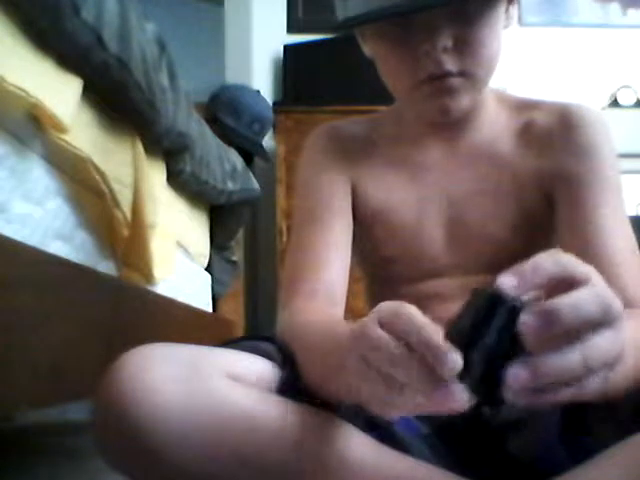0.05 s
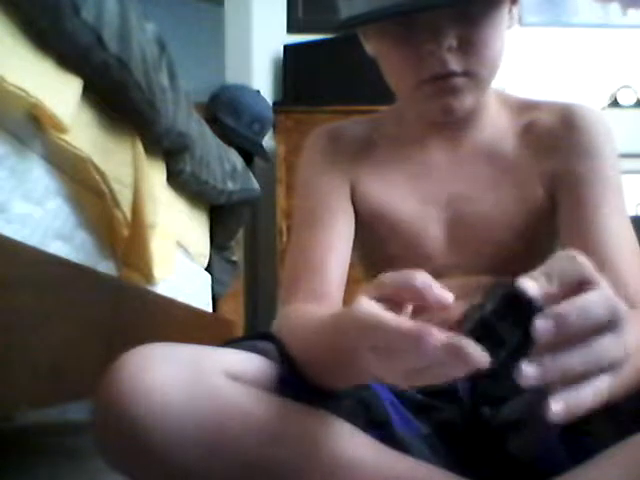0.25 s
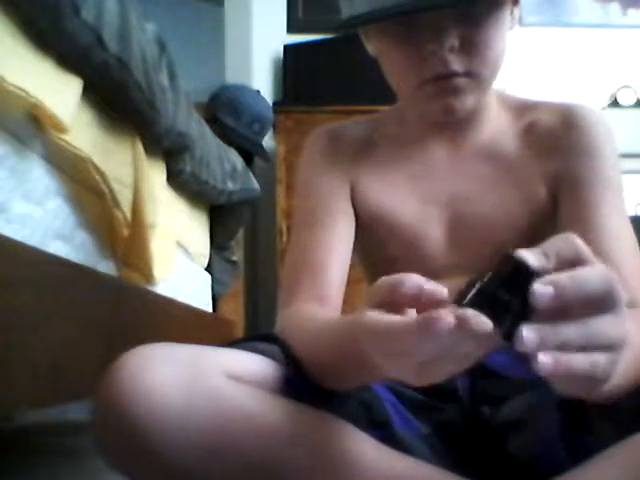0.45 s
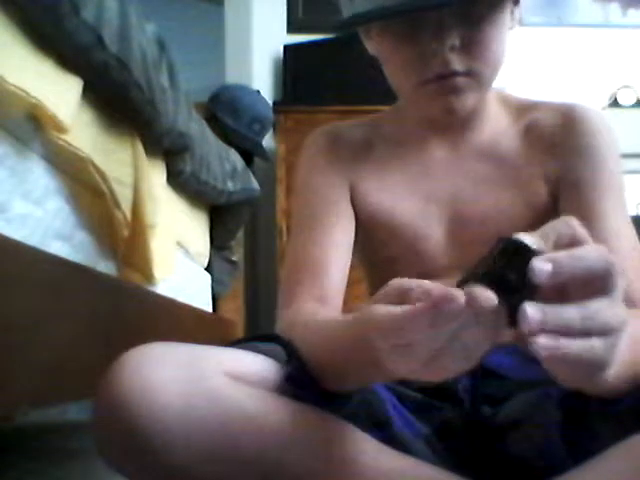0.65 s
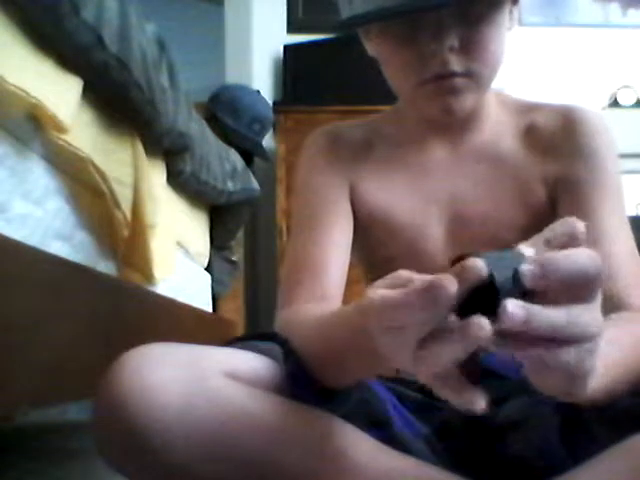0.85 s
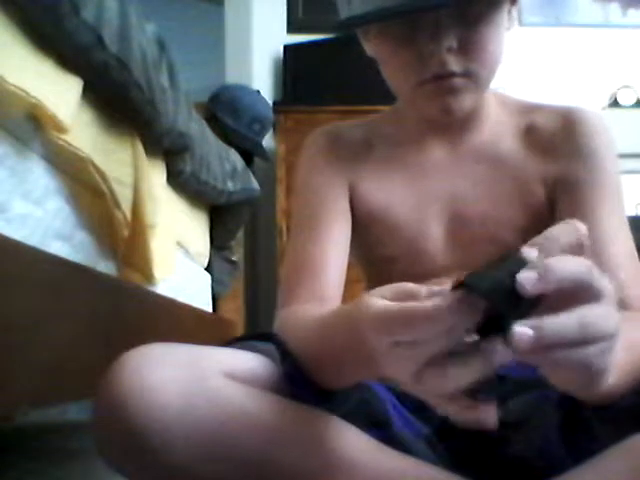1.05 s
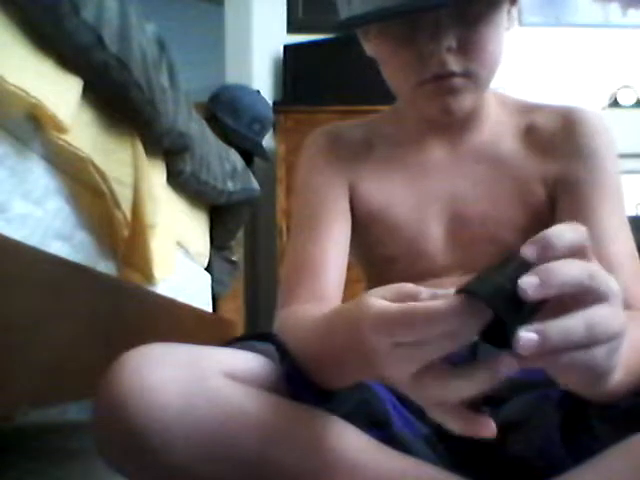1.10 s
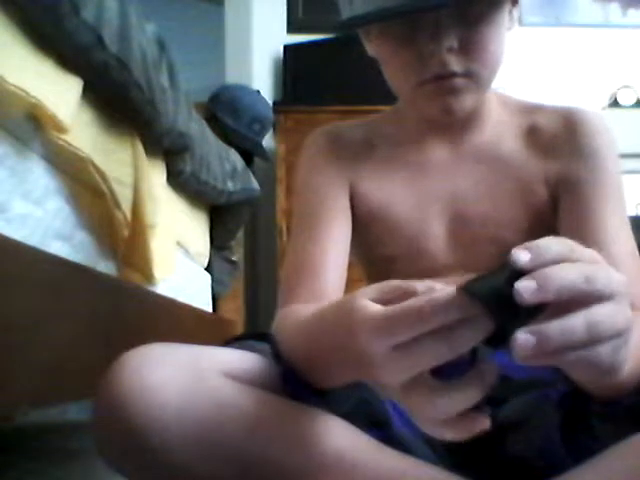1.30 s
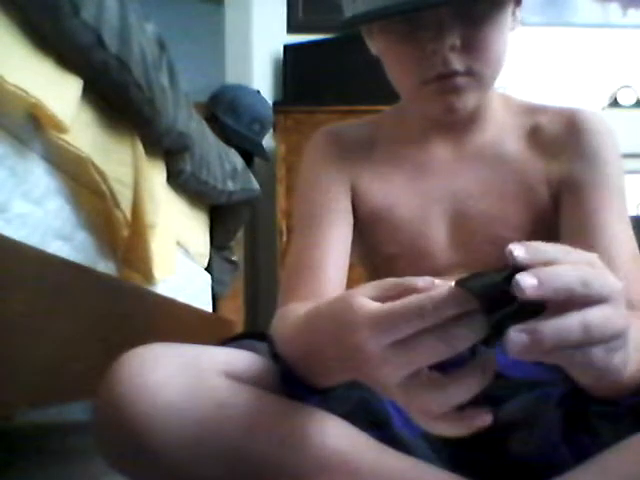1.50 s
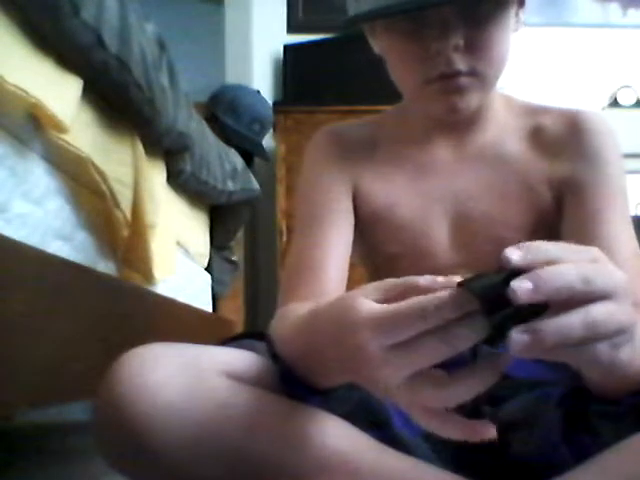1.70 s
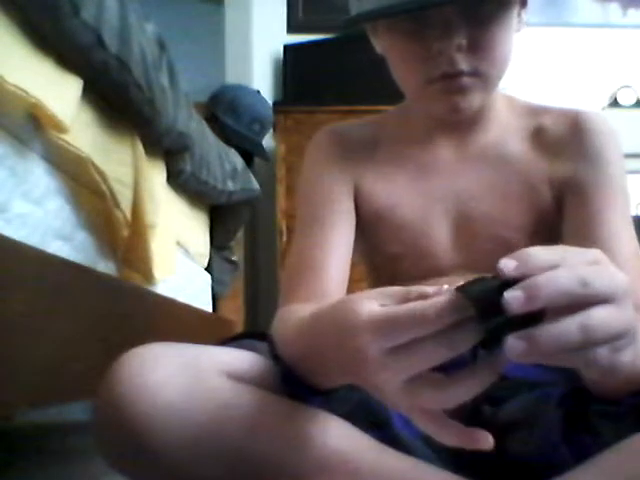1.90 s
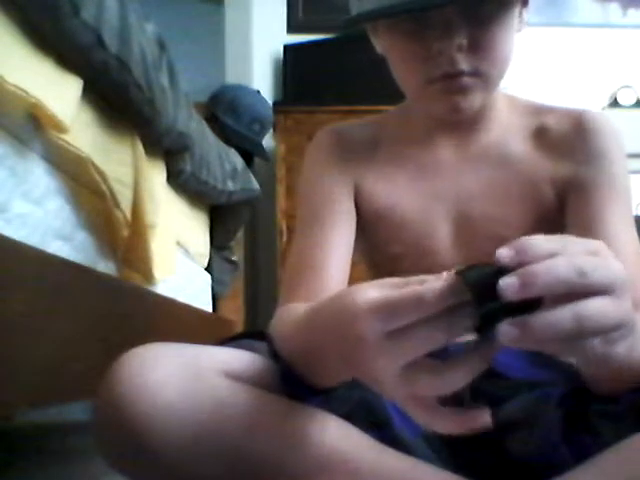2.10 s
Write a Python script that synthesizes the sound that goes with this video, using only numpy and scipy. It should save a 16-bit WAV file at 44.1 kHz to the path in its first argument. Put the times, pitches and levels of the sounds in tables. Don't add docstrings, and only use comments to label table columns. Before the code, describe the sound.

A small hollow plastic object snaps with one loud sharp clack, then rattles in the hands

```python
import sys
import numpy as np
from scipy import signal
from scipy.fft import rfft, irfft, next_fast_len
from scipy.io import wavfile
from scipy.ndimage import uniform_filter1d, map_coordinates

SR = 44100
rng = np.random.default_rng(int(sys.argv[2]) if len(sys.argv) > 2 else 0)


def generate_wav(signal):
    frames = np.transpose(np.atleast_2d(signal))
    scaled = np.clip(frames, -1, 1) * 32767
    pcm = np.round(scaled).astype(np.int16)
    wavfile.write(sys.argv[1], SR, pcm)


def how_loud(loudness_db):
    steps = np.asarray(loudness_db, float) / 20
    return 10 ** steps


N = 94815

# t/s, cavity level/dB, cavity f/Hz, edge level/dB
FUMBLE = [(0.0, -24.5, 1450.0, -42), (0.0027, -32, 1970.0, -43), (0.0041, -41, 1520.0, -35.5),
          (0.0052, -30.5, 1530.0, -53), (0.0168, -47.5, 1670.0, -61.5), (0.0299, -44.5, 2250.0, -60.5),
          (0.0367, -47.5, 1700.0, -62.5), (0.0523, -31.5, 1540.0, -63), (0.0618, -42, 1430.0, -62.5),
          (0.064, -38, 1590.0, -63), (0.0665, -37.5, 1540.0, -60), (0.07, -36.5, 2440.0, -63),
          (0.0784, -42, 1490.0, -64.5), (0.094, -45, 1530, -64.5), (0.1192, -46.5, 1550, -62.5)]
# t/s, cavity level/dB, cavity f/Hz, edge level/dB
TILT = [(0.7075, -29, 1813, -39), (0.7087, -57, 1802, -39), (0.7103, -40, 1991, -37),
        (0.7138, -29, 2330, -41.5), (0.7263, -31.5, 1393, -59), (0.727, -30.5, 2284, -55),
        (0.7334, -34, 2400, -61.8), (0.7377, -36, 2262, -63), (0.7422, -38, 2100.0, -60),
        (0.7468, -38.7, 2420, -63.3), (0.7593, -31, 2095, -59), (0.7627, -27, 2267, -63),
        (0.7665, -31, 2310, -59.7), (0.773, -34, 1744, -59.5), (0.7746, -33, 2294, -59.6),
        (0.7839, -40, 2188, -63), (0.7873, -26.5, 2274, -46), (0.7926, -33.5, 2348, -57),
        (0.7985, -39.5, 2361, -63), (0.8011, -39.5, 2260.0, -64), (0.8066, -35.5, 2260, -64),
        (0.8138, -41.5, 2460, -66), (0.8237, -44.7, 2130, -67), (0.828, -41, 2120.0, -68),
        (0.835, -40, 2250.0, -65), (0.8769, -41.5, 2220, -66)]
# t/s, cavity level/dB, cavity f/Hz, edge level/dB
SETTLE = [(1.1079, -36, 2660, -62), (1.1282, -40.7, 2460, -61), (1.1563, -38.5, 2500.0, -63),
          (1.1894, -36, 2420.0, -52), (1.192, -46, 2650.0, -53), (1.1936, -43, 2100, -46),
          (1.1983, -33.5, 2340, -50), (1.2016, -29.5, 2380, -39), (1.2106, -45, 2620, -60),
          (1.2251, -41, 2550, -62), (1.2371, -43, 2450.0, -61.7), (1.2508, -44, 2440, -61.8),
          (1.2608, -44.5, 1313, -56.6), (1.2626, -41.5, 2430, -62.3), (1.2698, -36.5, 2390.0, -53),
          (1.2764, -50, 2380, -62.0), (1.2832, -42.5, 2200.0, -53), (1.2898, -47.0, 2370, -63.7),
          (1.563, -48, 2730, -56.5), (1.5665, -46.5, 2410, -58.5), (1.57, -49, 2550, -51.5),
          (1.5741, -50.5, 2560, -55), (1.8227, -51.5, 2600, -54)]
# t/s, cavity level/dB, cavity f/Hz, edge level/dB, edge f/Hz
SNAP = [(0.1862, -49.5, 2350, -46.5, 5800), (0.1863, -36.5, 2350.0, -56.5, 5640),
        (0.1929, -32.5, 1410.0, -57.5, 4500.0), (0.1954, -23.5, 1510.0, -59, 6770),
        (0.1978, -34, 2430.0, -51.5, 9500), (0.2005, -32, 2350.0, -60.5, 3680.0),
        (0.2029, -23.5, 1390.0, -45.5, 4770), (0.2074, -18.5, 2060.0, -18.5, 5860),
        (0.2109, -3, 2250.0, -16.5, 3730), (0.213, -13.5, 2420.0, -11, 5300),
        (0.2145, -15, 1050, -11.5, 4330), (0.2163, -13, 2260.0, -17, 6200),
        (0.2183, -23, 2360.0, -12, 4300), (0.2197, -15, 2470.0, -24, 5400), (0.2215, -8, 2370.0, -22, 4200),
        (0.2242, -23.5, 2360.0, -3, 4800), (0.2266, -18.5, 2300.0, -10.5, 3800),
        (0.2289, -11, 2430.0, -9.5, 4080), (0.2315, -28, 2400.0, -21, 4860),
        (0.2352, -25.5, 2370.0, -28, 5060.0), (0.2398, -19, 2380.0, -23, 4070),
        (0.2436, -28.5, 2300.0, -22.5, 3870), (0.2463, -22.5, 2360.0, -28, 6000),
        (0.25, -23, 2410.0, -36, 5840.0), (0.2531, -26, 2360.0, -29.5, 6130.0),
        (0.2549, -21.5, 2390.0, -38, 3920), (0.2565, -33, 2490.0, -28, 4850),
        (0.259, -21.5, 2310.0, -24, 4580), (0.2606, -30, 3100.0, -23, 4630)]
# t/s, cavity
# level/dB, cavity f/Hz, edge level/dB, edge f/Hz
RATTLE = [(0.7171, -24, 2291, -30, 6960), (0.935, -34, 2400, -58, 7650), (0.9341, -33, 2330, -36, 7640),
          (0.9372, -27.5, 2260, -35.5, 4530), (0.9437, -34, 2400, -46, 4800),
          (0.9448, -28.9, 2250, -48, 6070.0), (0.9468, -33.5, 1420, -34.5, 4770.0),
          (0.9498, -38, 2230, -47.1, 5890.0), (0.9515, -40, 2400, -53.9, 4890.0),
          (0.9572, -29, 2320, -21.5, 5700), (0.966, -39, 2354, -31, 6000),
          (0.9675, -18.0, 2366, -24.5, 4620.0), (0.9688, -38, 2390, -28, 4500),
          (0.9712, -24, 2353, -26, 6260), (0.9754, -27, 2210, -28, 4660.0), (0.9776, -44, 2470, -37, 4700),
          (0.9792, -18.5, 2393, -29.5, 4420), (0.9819, -41, 2440, -28.5, 4300),
          (0.984, -35, 2410, -33.5, 4500), (0.9973, -38, 2380.0, -57, 4640.0),
          (1.0023, -33.5, 2760.0, -52.5, 4770), (1.0037, -28, 2370, -33, 4130.0),
          (1.0088, -39, 2630, -32.5, 6000), (1.0092, -30.5, 2610, -15.5, 6000),
          (1.0102, -20, 2600, -14.5, 5920.0), (1.017, -23, 1470, -26.5, 4750),
          (1.0178, -20.5, 2538, -20.5, 4670), (1.0247, -25, 2453, -17.5, 5950),
          (1.0277, -38, 2560.0, -31.5, 6220), (1.0291, -30, 1290.0, -38, 4730.0),
          (1.031, -15, 2447, -27.5, 4586), (1.0353, -21.5, 2553, -18.5, 6160.0),
          (1.0389, -22, 2437, -17.5, 9490), (1.0411, -26, 1396, -26, 5890),
          (1.0442, -25, 2470, -23.5, 5910), (1.0461, -43.5, 2566, -27, 4600),
          (1.047, -24, 2373, -47, 4310.0), (1.0594, -35, 2625, -48, 6500.0),
          (1.0629, -44, 2597, -49, 4610.0), (1.2005, -34, 2390, -32.5, 6670)]
# f/Hz, level/dB, T60/s
SHELL_MODES = [(462, -19, 0.014), (900, -10, 0.0062), (1580, -9, 0.013), (2547, -3, 0.0076),
               (3200, -16, .005)]
# f/Hz, level/dB, T60/s
RIM_MODES = [(3820, -7, 0.005), (4500, -15, 0.026), (6000, -5, 0.0065), (7800, -16, 0.0088),
             (10670, -12.5, 0.00316)]
# f/Hz, level/dB
CRACK_SPECTRUM = [(300, -17), (2500, -1.5), (7000, -1.5), (14000, -20)]
# f/Hz, level/dB, T60/s
KNOCK_MODES = [(150, -37.5, .025), (901.3, -13, .016)]
# start t/s, length/s, level/dB
CHATTER_SPELLS = [
    (0, .13, -57.5),
    (.212, 0.023, -24.5),
    (0.234, .03, -35),
    (.708, 0.02, -39.5),
    (0.761, 0.1, -55.5),
    (0.933, 0.045, -47),
    (1.011, 0.032, -32),
    (1.05, 0.27, -63),
]
# f/Hz, level/dB
RADIATION = [(100, -33.5), (350, 0), (9500, 2), (11500, 1.5), (15000, -20)]
# f/Hz, T60/s
ROOM_T60 = [(300, .35), (2400, 0.35), (4500, 0.37), (8000, 0.33), (13000, 0.15)]
# f/Hz, level/dB
ROOM_COLOUR = [(300, -3.5), (1400, 0.5), (2400, -2), (3600, -3), (4600, 1), (5700, -4.5), (9000, 6.5),
               (12000, 1.5)]
# f/Hz, level/dB
HISS_SPECTRUM = [(150, -22.5), (400, -6), (1500, -12.5), (3500, -15.5), (6000, -21), (9000, -17.5),
                 (14500, -17)]
# f/Hz, level/dB
RUMBLE_SPECTRUM = [(20, -14.5), (70, -2.5), (130, -2), (300, -5.5), (700, -32.5)]

CAVITY_T60_S, CAVITY_RISE_S = 0.012, 0.00078
SOFTEN_DB_PER_DB = 0.083
EDGE_T60_S, EDGE_RISE_S, EDGE_FADE_POWER = 0.0097, 0.00027, 1.4
DULL_EDGE_HZ, DULL_RIM_DB = 4500, -4
CRACK_T60_S, CRACK_DB = 0.0069, -2
KNOCK_S = 0.2112
CHATTER_HZ, CHATTER_SPREAD, CHATTER_OVERTONE = 2250, 0.22, 1.95
CHATTER_PER_S, CHATTER_DB = 960, 2.5
ROOM_DB, ROOM_DELAY_S, ROOM_BUILD_S = -18, 0.0025, 0.0051
SNAP_WET_DB, SNAP_ENDS_S = 3, 0.3
OPEN_DB, THRESHOLD_DB, SLOPE, RELEASE_DB_PER_S, SMOOTH_S = 9.5, -57, 0.6, 39, 0.02
DUCK_ABOVE_DB, DUCK_SLOPE, DUCK_LATE_S, DUCK_SPAN_S = -28, 1.2, 0.035, 0.055
HISS_DB = -61
RUMBLE_DB, RUMBLE_SWAY_DB, RUMBLE_DUCK_POWER = -66.5, 3.5, 2.8
SWELL_S, SWELL_WIDTH_S, SWELL_DB = 1.17, 0.091, 8
TOP_HZ = 14500


def contacts():
    sharp = list(SNAP + RATTLE)
    dull = [tuple(row) + (DULL_EDGE_HZ,) for row in FUMBLE + TILT + SETTLE]
    start_s, cavity_db, cavity_hz, edge_db, edge_hz = np.array(sharp + dull).T[:, :, None]
    t = np.arange(SR // 30)[None] / SR
    luck = rng.standard_normal((len(start_s), 24))

    cavity_rise_s = CAVITY_RISE_S * how_loud(SOFTEN_DB_PER_DB * np.clip(cavity_db - edge_db, 0, 20))
    edge_t60_s = EDGE_T60_S * (DULL_EDGE_HZ / edge_hz) ** EDGE_FADE_POWER
    rows = ring(t, cavity_hz, cavity_db + 6.5, CAVITY_T60_S, cavity_rise_s)
    rows += ring(t, edge_hz, edge_db + 1.5, edge_t60_s, EDGE_RISE_S)

    rim_db = edge_db + DULL_RIM_DB * (edge_hz == DULL_EDGE_HZ)
    for k, (hz, db, t60_s) in enumerate(SHELL_MODES + RIM_MODES):
        in_shell = k < len(SHELL_MODES)
        base_db = cavity_db if in_shell else rim_db
        rise_s = cavity_rise_s if in_shell else EDGE_RISE_S
        mode_hz = hz * (1 + 0.044 * luck[:, k, None])
        mode_db = base_db + db + 3 * luck[:, k + 12, None]
        rows += ring(t, mode_hz, mode_db, t60_s, rise_s)

    crack = coloured(CRACK_SPECTRUM, rows.size).reshape(rows.shape)
    crack *= 1 - np.exp(-(t / EDGE_RISE_S) ** 2)
    rows += how_loud(edge_db + CRACK_DB - 60 * t / CRACK_T60_S) * crack
    return place(start_s[:, 0], rows)


def knock():
    hz, db, t60_s = np.array(KNOCK_MODES).T[:, :, None]
    t = np.arange(SR // 15)[None] / SR
    return place(np.full(len(KNOCK_MODES), KNOCK_S), ring(t, hz, db, t60_s, CAVITY_RISE_S))


def chatter():
    start_s, length_s, db = np.array(CHATTER_SPELLS).T[:, :, None]
    gap_luck, level_luck, pitch_luck = rng.standard_normal((3, len(CHATTER_SPELLS), 180))
    since_s = np.cumsum(np.exp(0.6 * gap_luck), axis=1) / CHATTER_PER_S
    tick_db = db + CHATTER_DB + 3 * level_luck - 5 * since_s / length_s
    tick_db = tick_db - 200 * (since_s > length_s)
    tick_db = tick_db.reshape(-1, 1)
    hz = (CHATTER_HZ * np.exp(CHATTER_SPREAD * pitch_luck)).reshape(-1, 1)
    t = np.arange(SR // 60)[None] / SR
    rows = ring(t, hz, tick_db, CAVITY_T60_S, CAVITY_RISE_S)
    rows += ring(t, CHATTER_OVERTONE * hz, tick_db - 5, EDGE_T60_S, EDGE_RISE_S)
    return place((start_s + since_s).ravel(), rows)


def room(x):
    hz, t, z = signal.stft(rng.standard_normal(SR * 3 // 4), SR, nperseg=256)
    decay = how_loud(-60 * t / along(ROOM_T60, hz)[:, None])
    tail = signal.istft(z * decay, SR, nperseg=256)[1]
    tail = tail * (1 - np.exp(-np.arange(len(tail)) / SR / ROOM_BUILD_S))
    tail = np.pad(tail, (round(ROOM_DELAY_S * SR), 0))
    wet = signal.fftconvolve(x, tail / np.linalg.norm(tail))[:N]
    return shaped(wet, ROOM_COLOUR)


def expander(x):
    wanted_db = np.clip(SLOPE * (power_db(x, 400) - THRESHOLD_DB), 0, OPEN_DB)
    fall_db = RELEASE_DB_PER_S * np.arange(N) / SR
    gain_db = np.maximum.accumulate(wanted_db + fall_db) - fall_db
    gain_db = uniform_filter1d(gain_db, round(SMOOTH_S * SR))

    slow_db = power_db(x, round(DUCK_SPAN_S * SR))
    late_db = np.pad(slow_db, (round(DUCK_LATE_S * SR), 0), "edge")[:N]
    duck_db = DUCK_SLOPE * np.maximum(late_db - DUCK_ABOVE_DB, 0)
    return how_loud(gain_db), how_loud(-duck_db)


def hiss(gain, duck):
    return gain * duck * how_loud(HISS_DB) * coloured(HISS_SPECTRUM, N)


def rumble(duck):
    sway = map_coordinates(rng.standard_normal(N // 4000 + 4), [np.arange(N) / 4000])
    swell_db = SWELL_DB * np.exp(-((np.arange(N) / SR - SWELL_S) / SWELL_WIDTH_S) ** 2)
    level = how_loud(RUMBLE_DB + RUMBLE_SWAY_DB * sway + swell_db)
    return duck ** RUMBLE_DUCK_POWER * level * coloured(RUMBLE_SPECTRUM, N)


def ring(t, hz, db, t60_s, rise_s):
    rise = 1 - np.exp(-(t / rise_s) ** 2)
    return how_loud(db - 60 * t / t60_s) * rise * np.sin(2 * np.pi * hz * t)


def place(start_s, rows):
    first = np.clip(np.round(start_s * SR).astype(int), 0, N)
    at = first[:, None] + np.arange(rows.shape[1])
    return np.bincount(at.ravel(), rows.ravel(), N + rows.shape[1] + 1)[:N]


def power_db(x, span):
    return 10 * np.log10(np.abs(uniform_filter1d(x ** 2, span)) + 1e-12)


def along(points, hz):
    f, v = np.transpose(points)
    return np.interp(np.log(hz + 1), np.log(f + 1), v)


def shaped(x, points):
    m = next_fast_len(len(x) + 4096)
    gain = how_loud(along(points, np.fft.rfftfreq(m, 1 / SR)))
    return irfft(rfft(x, m) * gain, m)[:len(x)]


def coloured(points, n):
    x = shaped(rng.standard_normal(n), points)
    return x / np.sqrt(np.mean(x ** 2) + 1e-20)


def scene():
    prop = shaped(contacts() + chatter(), RADIATION) + knock()
    in_snap = np.arange(N) < SNAP_ENDS_S * SR
    prop = prop + room(prop * how_loud(ROOM_DB + SNAP_WET_DB * in_snap))
    gain, duck = expander(prop)
    mix = prop + hiss(gain, duck) + rumble(duck)
    return np.array([mix, mix])


def roll_off(x):
    return signal.sosfilt(signal.butter(12, 15430, fs=SR, output="sos"), x)


def record(dry):
    m = next_fast_len(N)
    limited = dry / (1 + np.abs(dry) ** 16) ** (1 / 16)
    in_band = np.fft.rfftfreq(m, 1 / SR) < TOP_HZ
    mix = irfft(rfft(limited, m) * in_band, m)[:, :N]
    return roll_off(mix)


dry = scene()
out = record(dry)
generate_wav(out)
```